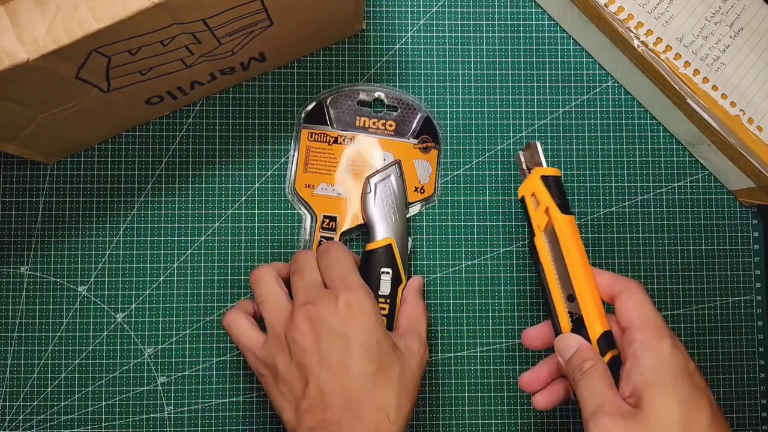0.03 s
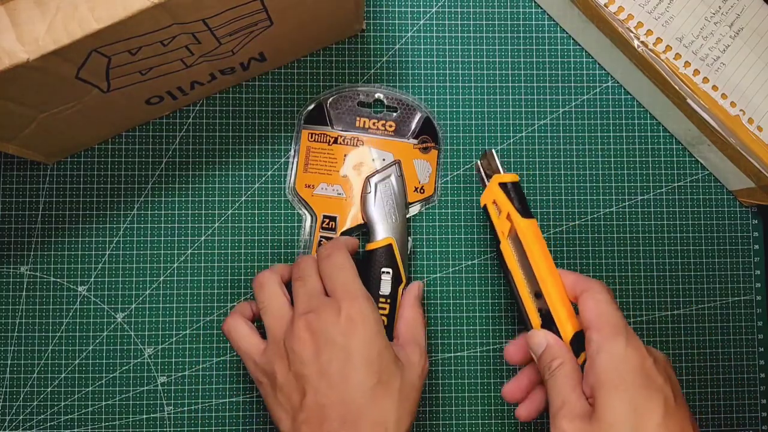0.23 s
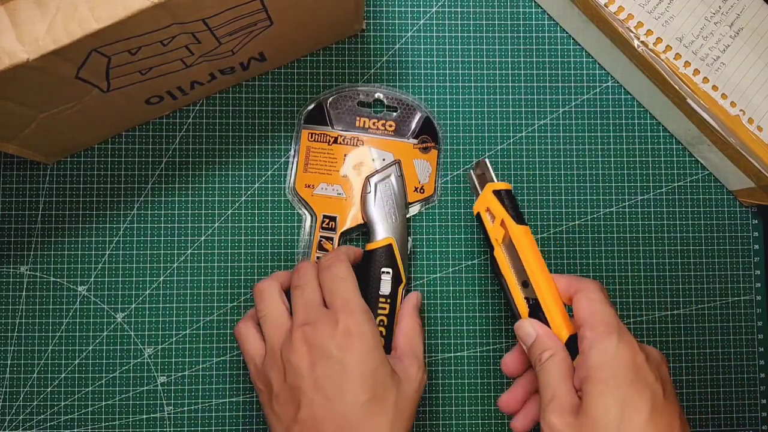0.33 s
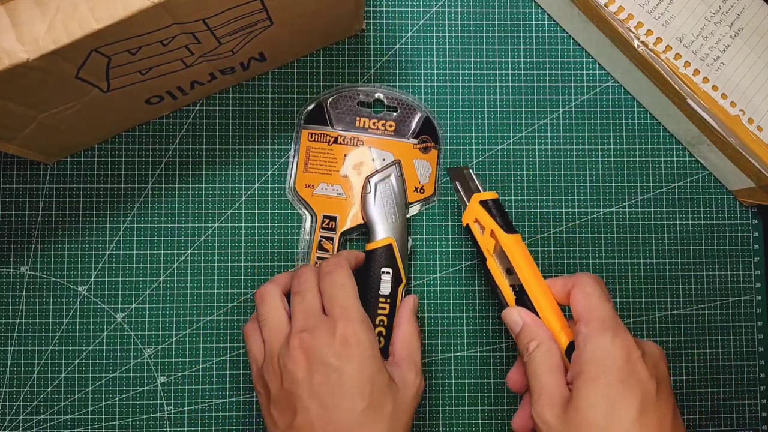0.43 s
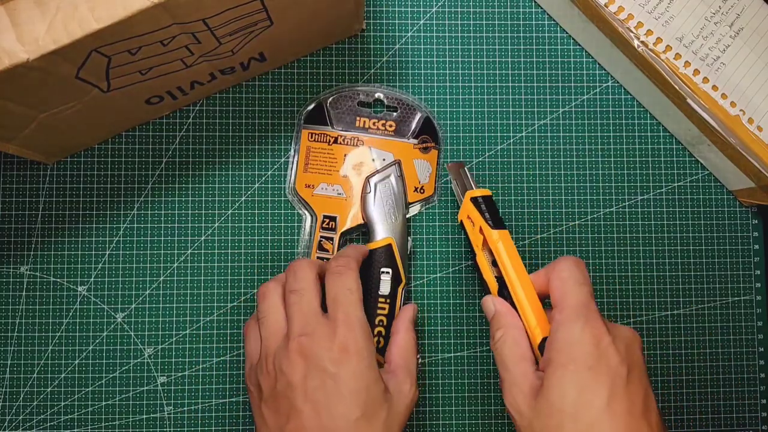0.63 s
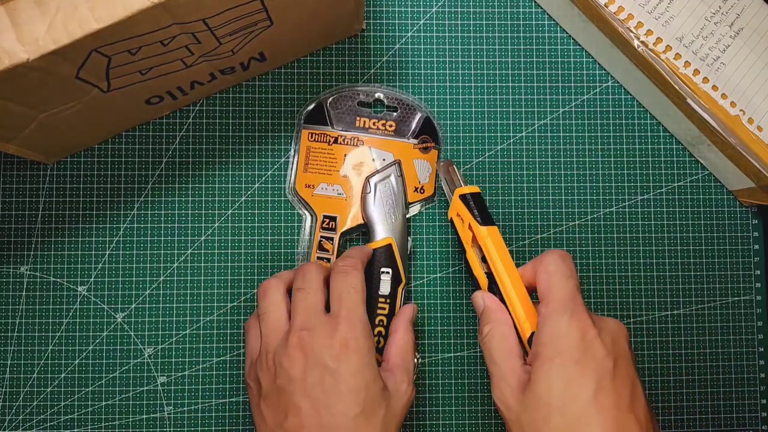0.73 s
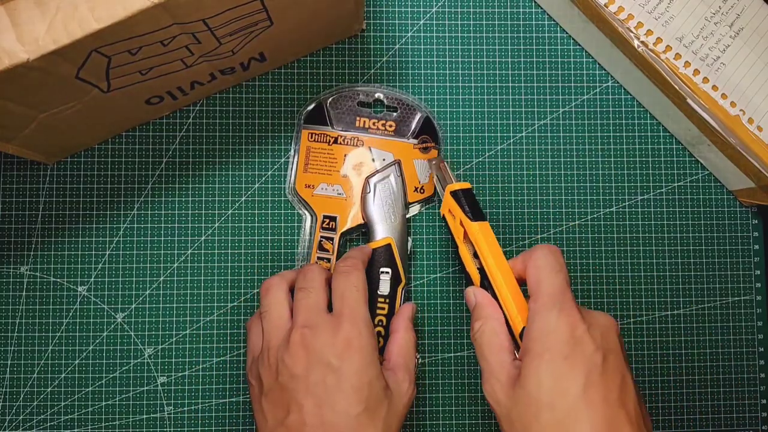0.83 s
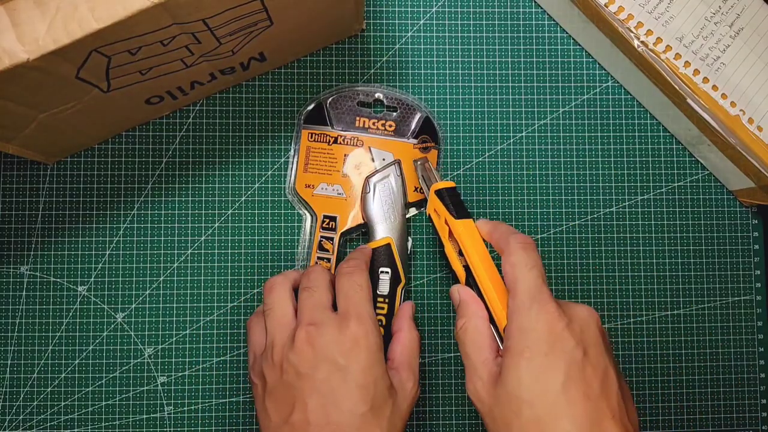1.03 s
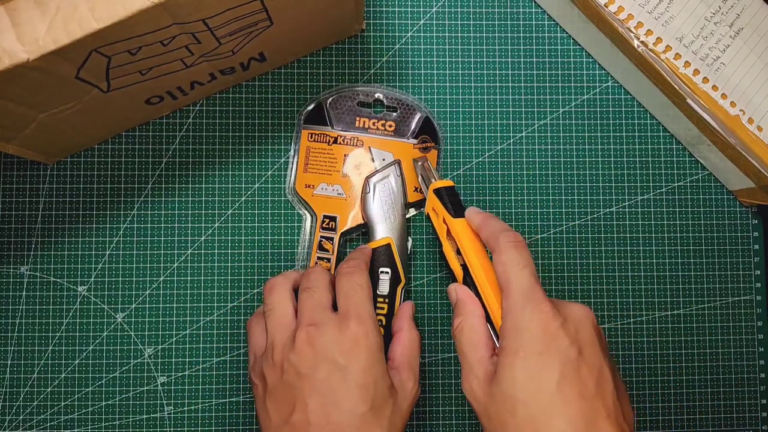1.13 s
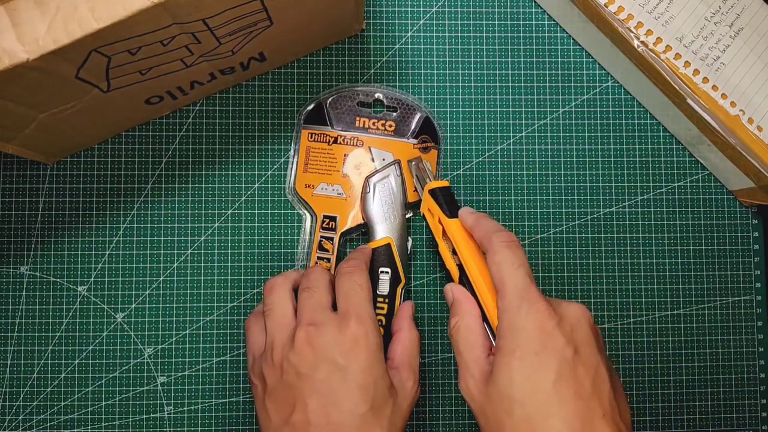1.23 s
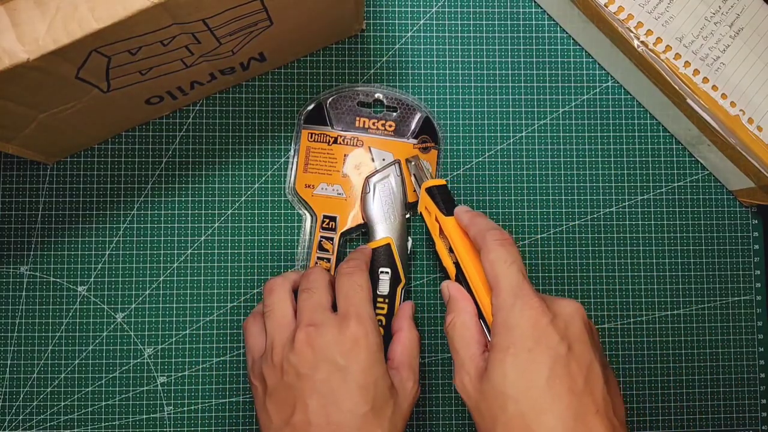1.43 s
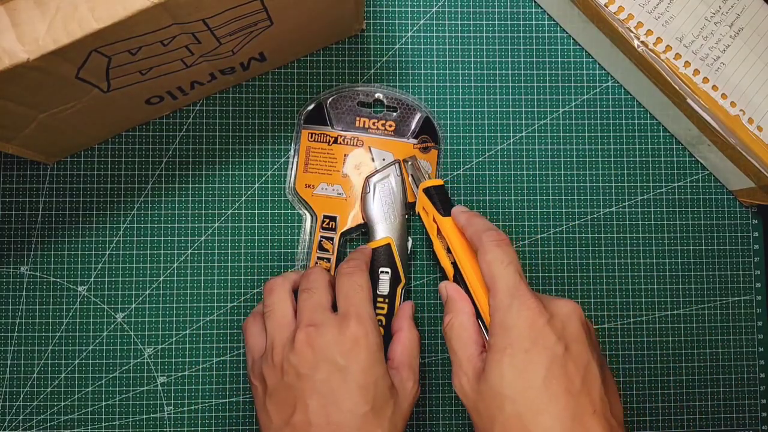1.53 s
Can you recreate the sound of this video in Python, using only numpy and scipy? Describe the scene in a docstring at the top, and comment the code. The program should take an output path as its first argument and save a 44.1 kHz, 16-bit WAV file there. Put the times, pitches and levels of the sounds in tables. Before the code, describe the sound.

Snap-off utility knife slider ratcheting out in a quick burst of bright clicks after soft plastic knocks

```python
"""Soft plastic knocks come first, as the grip shifts on a snap-off utility knife in a small, fairly live room.
Then the thumb drives the slider over its steel notches: a quick burst of bright clicks, over a fine scrape.
Later the blade brushes and ticks against a plastic blister pack, with a faint steady room tone under it all.
Knocks and table thuds are decaying modes; clicks and ticks are short coloured noise; rubs and scrape are
sparse noise grains; each click adds a low overload swing; the reflections are a decaying noise tail."""
import sys
import numpy as np
from scipy import signal
from scipy.fft import rfft, irfft
from scipy.io import wavfile
from scipy.ndimage import uniform_filter1d

SR = 44100
rng = np.random.default_rng(int(sys.argv[2]) if len(sys.argv) > 2 else 0)


def transcribe(signal):
    """Save signal, clipped to [-1, 1], as a 16-bit WAV file at the path in sys.argv[1]."""
    frames = np.atleast_2d(signal).T
    limited = np.clip(frames, -1, 1)
    pcm = np.round(limited * 32767).astype(np.int16)
    wavfile.write(sys.argv[1], SR, pcm)


N = 70560


def amp(db):
    """Decibels to gain."""
    return 10 ** (np.asarray(db) / 20)


def read(points, hz):
    """Reads a spectrum on a log-frequency axis."""
    f, value = np.transpose(points)
    return np.interp(np.log(hz + 1), np.log(f + 1), value)


def unit(x):
    """Scales each channel to energy 1."""
    return x / np.sqrt((x ** 2).sum(-1, keepdims=True) + 1e-20)


def pan(db):
    """Left and right gains for a level difference; positive leans left."""
    return amp([[db / 2], [-db / 2]])


def add(mix, s, sound):
    """Mixes a sound in at time s."""
    part = mix[..., max(round(s * SR), 0):][..., :sound.shape[-1]]
    part += sound[..., :part.shape[-1]]


def ring(modes, detune=0., size=8192):
    """Struck modes as decaying sines, each randomly off pitch by the fraction detune."""
    t = np.arange(size) / SR
    out = np.zeros(size)
    for hz, db, t60 in modes:
        pitch = hz * (1 + detune * rng.normal())
        out += amp(db - 60 * t / t60) * np.sin(2 * np.pi * pitch * t)
    return out


def snap(colour_db, decay_s, rise_s, size=2048):
    """A dense, quickly dying noise burst of energy 1 with the given colour (a function of Hz)."""
    t, hz = np.arange(size) / SR, np.fft.rfftfreq(size, 1 / SR)
    envelope = np.exp(-t / decay_s) * np.minimum(t / rise_s, 1)
    burst = rfft(rng.standard_normal(size) * envelope)
    power = abs(uniform_filter1d(abs(burst) ** 2, size=27))
    # flatten the burst's own broad colour, then apply the wanted one
    log_gain = np.log(amp(colour_db(hz))) - .5 * np.log(power + 1e-12)
    # minimum phase keeps the energy at the onset
    mirrored = np.r_[log_gain, log_gain[-2:0:-1]]
    causal = np.exp(np.conj(signal.hilbert(mirrored)))[:len(hz)]
    return unit(irfft(burst * causal))


# Colour of the steady air noise. Each row: frequency in Hz, relative level in dB per Hz.
AIR_COLOUR = [(20, -3.5), (50, 0), (100, -5), (170, -6), (300, -7.5), (500, -16.5), (800, -20.5),
              (1500, -22), (3000, -27.5), (8000, -34.5), (15000, -33), (16000, -49)]
# Faint fan tones. Each row: frequency in Hz, RMS level in dB.
FAN_TONES = [(161.5, -70.5), (436, -76), (533, -74.5), (877, -75)]
AIR_DB = -58.5
AIR_SAME_LOW, AIR_SAME_HIGH = 0.48, 0.33  # left-right likeness below 400 Hz and above 4 kHz


def room_tone():
    """Low steady rumble and hiss, partly shared by both sides, with a few faint fan tones."""
    t, hz = np.arange(N) / SR, np.fft.rfftfreq(N, 1 / SR)
    a, b = rfft(rng.standard_normal((2, N)))
    same = read([(400, AIR_SAME_LOW), (4000, AIR_SAME_HIGH)], hz)
    stereo = np.array([a, same * a + np.sqrt(1 - same ** 2) * b])
    air = unit(irfft(stereo * amp(read(AIR_COLOUR, hz)), N)) * np.sqrt(N)
    hum = sum(np.sqrt(2) * amp(db) * np.sin(2 * np.pi * (f * t + rng.random())) for f, db in FAN_TONES)
    return (amp(AIR_DB) * air + hum) * pan(db=1)


# Reverberation by band. Each row: frequency in Hz, t60 in seconds, relative level in dB.
REVERB_BANDS = [(100, .4, -8), (220, 0.48, -2), (500, 0.48, -8), (950, 0.25, -6.5), (1300, .34, -7),
                (1980, 0.34, -3), (4000, 0.32, -4.5), (6950, 0.33, -7.5), (9000, 0.31, -7),
                (11000, 0.23, -6.5), (15500, 0.31, -4.5)]
REVERB_SHARED_HZ = 710  # the two sides share the tail well below this
REVERB_DELAY_S, REVERB_BUILD_S = 0.003, 0.0025
EARLY_DB, EARLY_S = -4, 0.018  # extra strength at first, and its decay
REVERB_PAN_DB = -0.5


def room(x):
    """Diffuse reflections, stronger at first, each band dying at its own speed."""
    t = np.arange(SR) / SR
    taps = rng.standard_normal((2, SR)) * (rng.random((2, SR)) < 5000 / SR)
    hz, at, z = signal.stft(unit(taps), SR, nperseg=256)
    same = np.exp(-(hz / REVERB_SHARED_HZ) ** 2)[:, None]
    z = np.array([z[0], same * z[0] + np.sqrt(1 - same ** 2) * z[1]])
    t60 = read([(f, t60) for f, t60, db in REVERB_BANDS], hz)[:, None]
    level = read([(f, db) for f, t60, db in REVERB_BANDS], hz)[:, None]
    even_energy = np.sqrt(2 * np.log(1000) / t60)  # long decays do not gain level
    decaying = z * amp(level - 60 * at / t60) * even_energy
    tail = signal.istft(decaying, SR, nperseg=256)[1][:, :SR]
    tail = tail * np.clip((t - REVERB_DELAY_S) / REVERB_BUILD_S, 0, 1)
    tail = tail * (1 + amp(EARLY_DB) * np.exp(-t / EARLY_S))
    mono = x.sum(0)[None] / np.sqrt(2)
    return signal.fftconvolve(mono, tail, axes=1)[:, :N] * pan(REVERB_PAN_DB)


# Soft rubs of hand and blade. Each row: peak time in seconds, swell time to either side in seconds,
# level in dB, centre in Hz, width in octaves.
RUB_SWELLS = [(.09, .025, -60, 6000, .8), (.215, .03, -55, 7000, .9), (.965, .022, -62, 1200, .7),
              (1.075, .03, -72, 2500, 1), (1.07, .028, -71, 10000, .35)]


def rubs():
    """Sliding friction: brief swells of grainy band noise."""
    t, hz, out = np.arange(N) / SR, np.fft.rfftfreq(N, 1 / SR), np.zeros((2, N))
    for s, length, db, centre, width in RUB_SWELLS:
        grains = rng.standard_normal((2, N)) * (rng.random(N) < 2500 / SR)  # 2500 grains per second
        band = np.exp(-.5 * (np.log2((hz + 1) / centre) / width) ** 2)
        rub = unit(irfft(rfft(grains) * band, N)) * np.sqrt(N)
        out += amp(db) * rub * np.exp(-((t - s) / length) ** 2)
    return out


# Colour of the blade tick. Each row: frequency in Hz, relative level in dB.
TICK_COLOUR = [(500, -20), (1300, -17), (1700, -0.5), (2200, 2), (2600, -1), (3000, -14), (3500, -2.5),
               (4200, -7), (5000, -10), (8000, -16), (13000, -21), (16000, -35)]
# Left-right colour difference, shared with the clicks. Each row: frequency in Hz, difference in dB.
SIDE_COLOUR = [(200, 1), (900, 1), (1400, -3.5), (2000, 1.5), (2800, -11.5), (3800, 1.5), (5400, -1.5),
               (7000, 3.5), (9000, 4.5), (13000, 1.5)]
TICK_S, TICK_DB, TICK_DECAY_S = 1.1438, -18, 0.002


def blade_tip():
    """One small tick of the blade on the plastic pack: a short coloured burst on each side."""
    out, sides = np.zeros((2, N)), []
    for sign in (1, -1):
        colour = lambda hz: read(TICK_COLOUR, hz) + sign * read(SIDE_COLOUR, hz) / 2
        sides.append(snap(colour, TICK_DECAY_S, rise_s=0.00064))
    add(out, TICK_S, amp(TICK_DB) * np.array(sides) * pan(db=2.5))
    return out


# Dull bumps of the hand on the table. Each row: start in seconds, level in dB, pitch in Hz, t60 in seconds.
TABLE_BUMPS = [(.064, -35.5, 207, 0.11), (.168, -35.5, 90.6, 0.13), (.198, -39, 61, 0.12)]
BUMP_RISE_S = 0.0043


def bumps():
    """The hand leans on the table, which answers with a low, quickly damped note."""
    out, t = np.zeros((2, N)), np.arange(8192) / SR
    for s, db, hz, t60 in TABLE_BUMPS:
        add(out, s, ring([(hz, db, t60)]) * np.minimum(t / BUMP_RISE_S, 1))
    return out


# Knocks of the handle. Each row: start in seconds, relative level in dB, hard edge in dB, low thud in dB,
# ring tilt in dB per octave.
HANDLE_KNOCKS = [(0.0634, -17.5, 0.5, -6, 4), (0.0711, -7, -13, -10, -1), (0.1273, -5, -10.5, -5, -0.5),
                 (.143, -7, -24.5, -6, -1), (.157, -18, -14, -13.5, 3), (0.1644, 4, 5, 3.5, 7),
                 (0.1679, -3.5, -2, -4, 6.5), (0.1731, -2.5, 7.5, 3.5, 8.5), (.185, -12, -10.5, -3.5, 5.5),
                 (.194, 2, -6.5, -0.5, -5.5), (0.2016, -11, -13, -0.5, -10.5), (0.268, -25, -20.5, -15, 4)]
# Modes of the hollow handle. Each row: frequency in Hz, relative level in dB, t60 in seconds.
HANDLE_MODES = [(500, -21, .04), (957, -8.5, 0.032), (1038, 2, .018), (1143, -10.5, 0.014),
                (1326, -2, .024), (1450, -15.5, .02), (1990, -14, .025)]
# Colour of the hard edge. Each row: frequency in Hz, relative level in dB.
EDGE_COLOUR = [(300, -5.5), (480, -1), (680, -6.5), (1200, 7), (2100, -3.5), (2900, 0), (3400, -6),
               (4000, -5.5), (7000, -15.5), (10000, -14.5), (16000, -25)]
# Modes of the table. Each row: frequency in Hz, relative level in dB, t60 in seconds.
TABLE_MODES = [(60.5, -5.5, .15), (92, -7.5, 0.081), (168, -5, 0.056), (220.4, 4, 0.083),
               (285, -0.5, 0.091), (473, -3.5, 0.071)]
KNOCK_DB, EDGE_DB, THUD_DB = -18, -10.5, -39.5
KNOCK_RISE_S, THUD_RISE_S, EDGE_DECAY_S = 0.0019, 0.0036, 0.0029
KNOCK_PAN_DB, KNOCK_LEAD_S = 2.4, 0.00011  # louder and slightly earlier on the left
SNAP_RISE_S = .0007  # shared by the hard edge and the clicks


def handle():
    """Hollow plastic modes knocked with a hard edge, and a faint thud from the table."""
    out, t = np.zeros((2, N)), np.arange(8192) / SR
    pivot_hz = HANDLE_MODES[2][0]  # the strongest mode
    for s, db, edge_db, thud_db, tilt_db in HANDLE_KNOCKS:
        modes = [(hz, level + tilt_db * np.log2(hz / pivot_hz), t60) for hz, level, t60 in HANDLE_MODES]
        body = amp(KNOCK_DB + db) * ring(modes, detune=0.032) * np.minimum(t / KNOCK_RISE_S, 1)
        thud = amp(THUD_DB + thud_db) * ring(TABLE_MODES, detune=0.022) * np.minimum(t / THUD_RISE_S, 1)
        for side, at in enumerate([s, s + KNOCK_LEAD_S]):
            edge = snap(lambda hz: read(EDGE_COLOUR, hz), EDGE_DECAY_S, SNAP_RISE_S)
            add(out[side], at, body + thud)
            add(out[side], at, amp(EDGE_DB + edge_db) * edge)
    return out * pan(KNOCK_PAN_DB)


# Click colours with the slider back, halfway and forward. Each row: frequency in Hz, relative level in dB.
BACK_COLOUR = [(200, -15.5), (900, -20.5), (1600, -19), (2100, -7), (2700, -1.5), (3400, -11), (4300, -5),
               (4900, -11), (5600, 1), (7000, 1.5), (7700, -12.5), (9000, -2.5), (11200, -6.5),
               (12200, -12.5), (14000, -7.5), (15200, -13.5), (16200, -25.5)]
HALFWAY_COLOUR = [(200, -26), (900, -26), (1600, -22.5), (2600, -11.5), (3100, -5), (3500, 5.5),
                  (4100, 1.5), (5000, -8), (7000, 1.5), (7600, -7.5), (8600, 3.5), (9800, -7.5),
                  (11400, -3.5), (12500, -11), (14000, -4.5), (15200, -8.5), (16200, -24)]
FORWARD_COLOUR = [(200, -22.5), (900, -24), (1500, -16), (2400, -9.5), (3000, -0.5), (3900, -4),
                  (5000, -3.5), (7000, -4), (7600, -13.5), (8700, 2.5), (9800, -4.5), (11400, 0),
                  (12500, -9.5), (14000, -7), (15200, -4.5), (16200, -24)]


def slider_colour(position, hz):
    """The slider changes the free length of the track, and with it the colour of a click."""
    back, forward = np.clip(1 - 2 * position, 0, 1), np.clip(2 * position - 1, 0, 1)
    halfway = 1 - back - forward
    return (back * read(BACK_COLOUR, hz) + halfway * read(HALFWAY_COLOUR, hz)
            + forward * read(FORWARD_COLOUR, hz))


# Slider dragging between notches. Each row: start in seconds, length in seconds, relative level in dB.
SLIDER_DRAGS = [(.398, 0.028, -37), (0.424, .06, -43), (.51, 0.078, -37)]
SCRAPE_GRAINS_PER_S = 1800


def scrape():
    """Fine grains of friction, coloured by the track, as the slider drags along it."""
    out = np.zeros((2, N))
    for s, length, db in SLIDER_DRAGS:
        size = int(length * SR)
        hz = np.fft.rfftfreq(size, 1 / SR)
        grains = rng.standard_normal((2, size)) * (rng.random(size) < SCRAPE_GRAINS_PER_S / SR)
        drag = unit(irfft(rfft(grains) * amp(read(BACK_COLOUR, hz)), size)) * np.sqrt(size)
        add(out, s, amp(db) * drag * signal.windows.tukey(size) * pan(db=6.5))
    return out


# Ratchet clicks. Each row: start in seconds, relative level in dB, slider position from 0 back to 1 forward,
# left-right difference in dB, low offset in dB, clack of the plastic shell in dB.
RATCHET_CLICKS = [(0.3793, -7, 0.095, 6.5, -11, -2), (0.383, 2.5, 0.065, 3, 2, 2.5),
                  (0.3873, -3, 0, 5.5, -4, -3.5), (0.3946, -1.5, 0.31, 1.5, -10, -9.5),
                  (0.425, 0.5, 0.21, 4.5, -6, -11), (0.4503, -1, 0.23, 3.5, -5, -14),
                  (0.492, -2, 0.13, 6, -5, -10), (0.5049, 2.5, .4, 5.5, 0.5, -17),
                  (0.5266, 0.5, .5, 3.5, -5, -14), (0.5458, 2, 0.49, 3, 0.5, -7.5),
                  (.5718, 1, .9, 3.5, -4, -5.5), (0.5929, 0.5, 0.93, 5.5, 4, -3)]
# Ring of the steel track and blade. Each row: frequency in Hz, relative level in dB, t60 in seconds.
STEEL_MODES = [(3430, -6, .04), (4000, -11.5, 0.047), (5650, -9.5, .05), (6550, -8, .05), (6830, 0, .05),
               (7120, -2, .05), (8780, -9, .035), (9300, -9.5, .035)]
# Colour of the shell's clack. Each row: frequency in Hz, relative level in dB.
SHELL_COLOUR = [(400, -16.5), (1000, -17.5), (1400, -7.5), (1700, -9.5), (2100, -3.5), (2800, 1.5),
                (3500, -11.5), (4300, -0.5), (5200, -14), (16000, -39.5)]
CLICK_DB, STEEL_DB, SHELL_DB, SHELL_DECAY_S = 5, -40, -4.5, 0.0031
# brief low-frequency swing from recorder overload at each click: level, first dip, slow return, side
OVERLOAD_DB, OVERLOAD_S, OVERLOAD_RETURN_S, OVERLOAD_PAN_DB = -30, 0.0011, .012, 15
# left then right: share of the side colour, click decay in seconds, lag in seconds
CLICK_SIDES = [(1, 0.0014, 0.00027), (-0.54, 0.0036, .0003)]


def ratchet():
    """The slider's spring drops into each notch: snap, steel ring, plastic clack, and a low overload swing."""
    out, t = np.zeros((2, N)), np.arange(4096) / SR
    offset = t / OVERLOAD_S * np.exp(-t / OVERLOAD_S)
    offset -= OVERLOAD_S * t / OVERLOAD_RETURN_S ** 2 * np.exp(-t / OVERLOAD_RETURN_S)  # slow return
    for s, db, position, pan_db, offset_db, shell_db in RATCHET_CLICKS:
        for side, (sign, decay, lag) in enumerate(CLICK_SIDES):
            colour = lambda hz: slider_colour(position, hz) + sign * read(SIDE_COLOUR, hz) / 2
            gain = amp(db) * pan(pan_db)[side]
            click = gain * amp(CLICK_DB) * snap(colour, decay, SNAP_RISE_S)
            steel = gain * amp(STEEL_DB) * ring(STEEL_MODES, detune=0.0023)
            clack = snap(lambda hz: read(SHELL_COLOUR, hz), SHELL_DECAY_S, SNAP_RISE_S)
            add(out[side], s + lag, click)
            add(out[side], s + lag, steel)
            add(out[side], s + lag, amp(SHELL_DB + shell_db) * clack)
        add(out, s, -amp(OVERLOAD_DB + offset_db) * offset * pan(OVERLOAD_PAN_DB))
    return out


def scene():
    """Knife sounds, their reflections and the room tone."""
    clicks = ratchet() + scrape()
    knocks = handle() + bumps()
    tip = blade_tip() + rubs()
    reflections = room(amp(-2.52) * clicks + amp(-3.5) * knocks + amp(-6.0) * tip)
    return clicks + knocks + tip + reflections + room_tone()


PEAK_ROUNDING = .7  # ceiling that the rounded peaks approach
CUT_HZ = 16100


def record(dry):
    """Rounds off the sharpest peaks, then cuts the highest treble with a low-pass."""
    rounded = dry / (1 + (dry / PEAK_ROUNDING) ** 4) ** (1 / 4)
    low_pass = signal.firwin(255, CUT_HZ, window=("kaiser", 9), fs=SR)
    return signal.oaconvolve(rounded, low_pass[None], "same")


dry = scene()
out = record(dry)
transcribe(out)
```